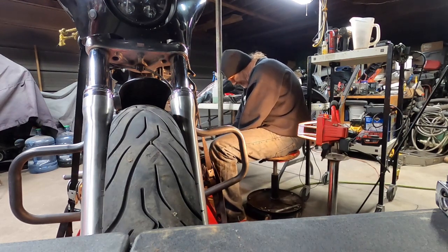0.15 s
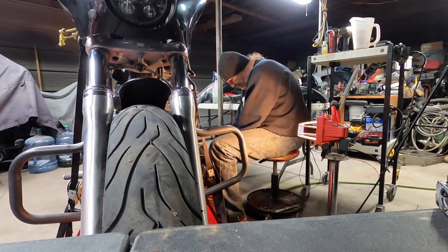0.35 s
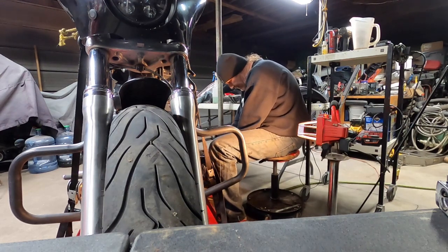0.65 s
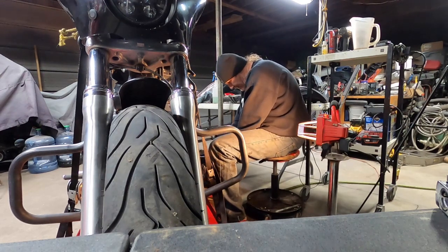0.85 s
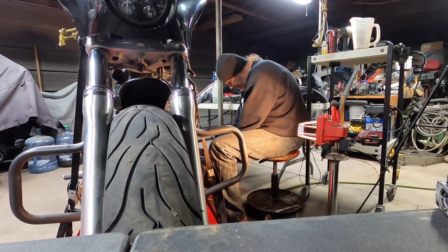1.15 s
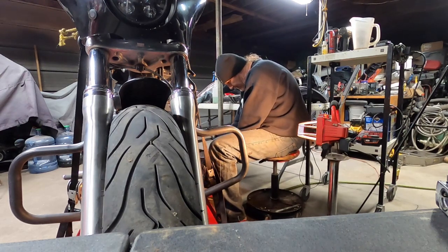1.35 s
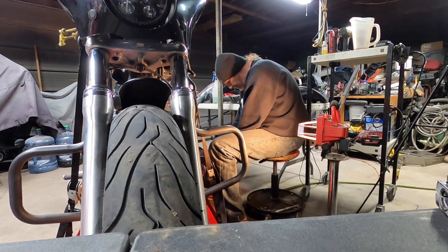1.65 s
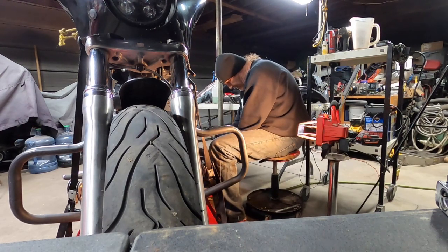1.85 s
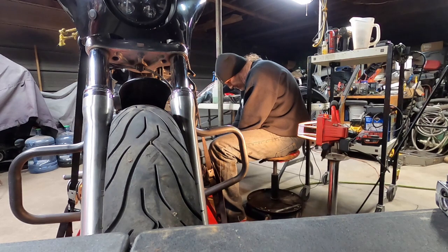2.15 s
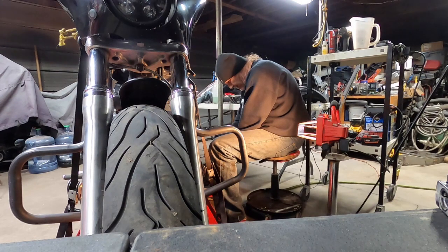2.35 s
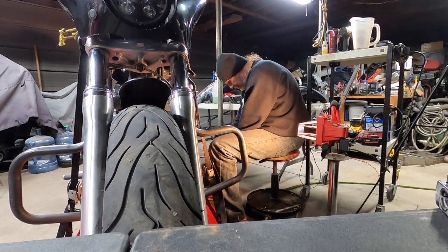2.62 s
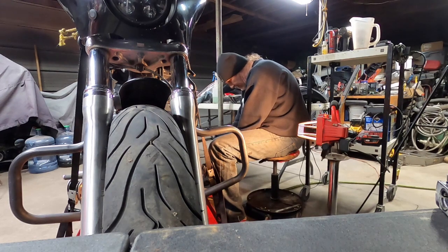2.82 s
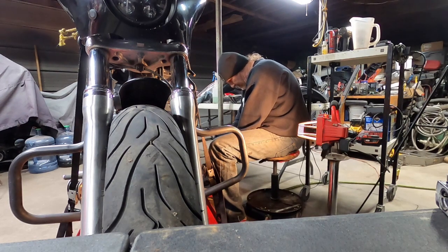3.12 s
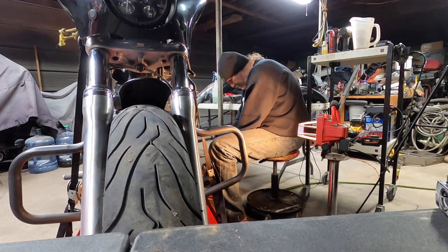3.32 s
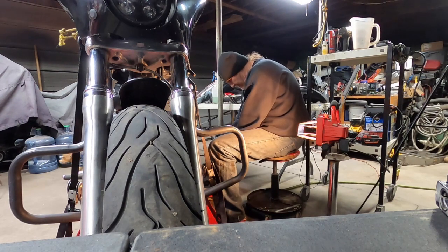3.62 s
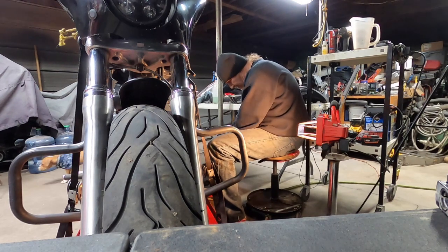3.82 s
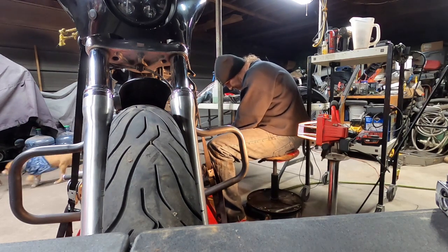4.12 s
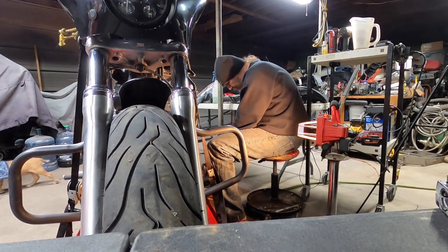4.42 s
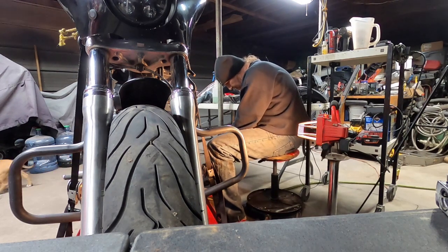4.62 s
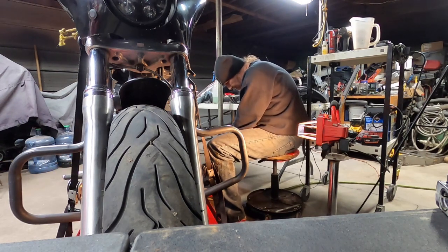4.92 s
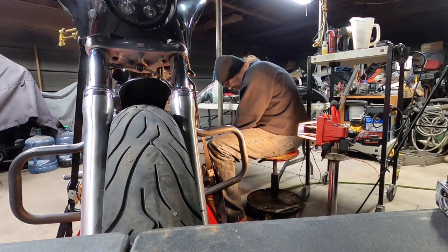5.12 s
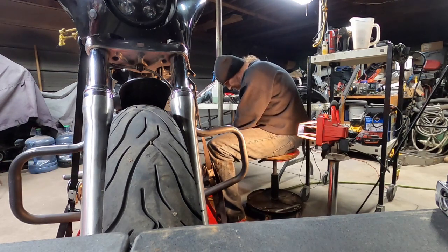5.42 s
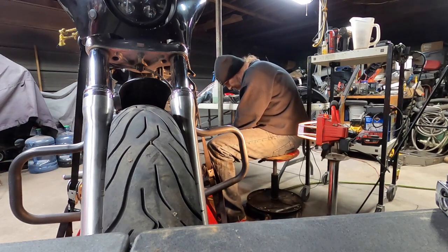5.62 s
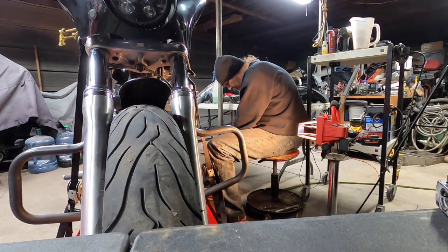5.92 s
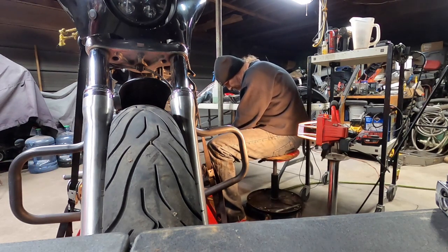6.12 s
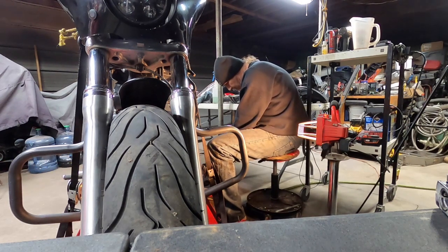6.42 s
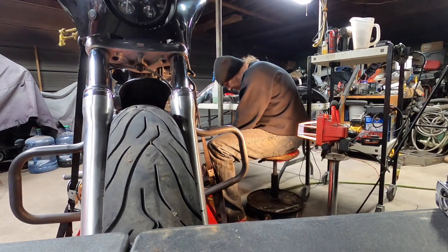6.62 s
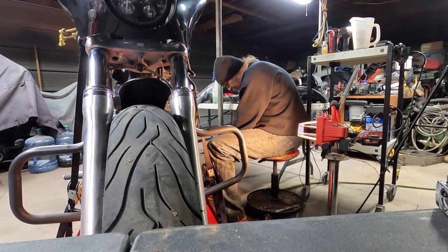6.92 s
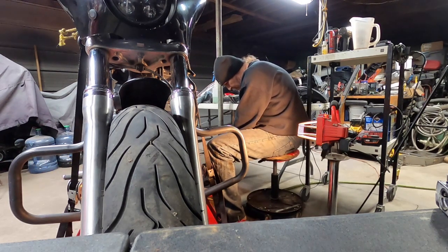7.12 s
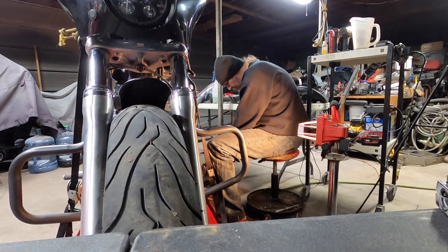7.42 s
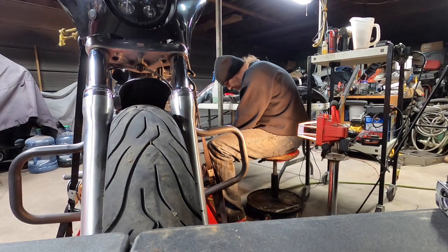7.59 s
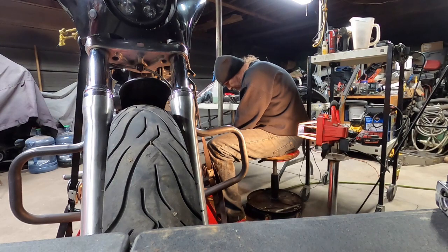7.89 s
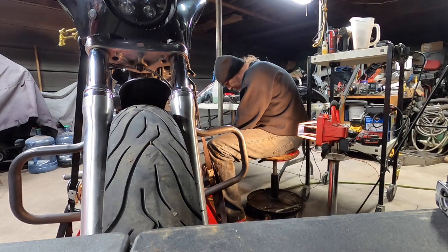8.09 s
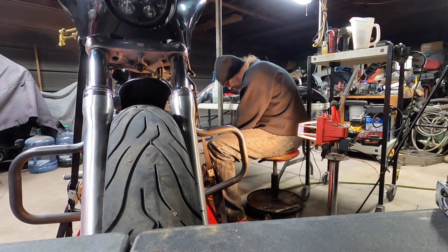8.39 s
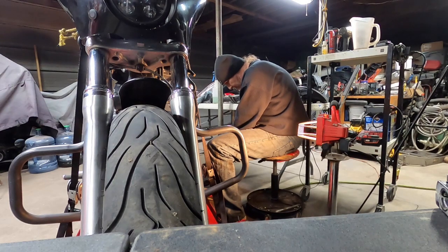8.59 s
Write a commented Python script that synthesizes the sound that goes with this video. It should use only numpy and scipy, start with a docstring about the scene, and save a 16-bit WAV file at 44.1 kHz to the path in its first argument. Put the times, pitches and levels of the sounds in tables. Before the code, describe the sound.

In a cluttered garage, a fan rushes and hums without pause, heavier on the left, over a low fluttering rumble. A few small metal parts clink, then an air tool rips out a quarter-second burst of hiss and rough hammering. A long quiet stretch with faint clinks follows, then two still shorter bursts come close together near the end. Stereo microphones nearby; the background dips after each burst and slowly returns.

```python
"""An air tool is fired in three short bursts on a motorcycle in a garage: exhaust air hisses out at once,
then the piston hammers unevenly, shaking the frame and ringing the steel. Small parts clink.
A fan rushes and hums throughout, mostly on the left microphone, above a low rumble of the building.
The microphones' gain control ducks at each burst and slowly lets the hum back."""
import sys
import numpy as np
from scipy import signal
from scipy.fft import rfft, irfft, next_fast_len
from scipy.io import wavfile
from scipy.ndimage import uniform_filter1d, minimum_filter1d, map_coordinates

SR = 44100
rng = np.random.default_rng(int(sys.argv[2]) if len(sys.argv) > 2 else 0)


def unload_wav(signal):
    """Save mono or channel-first audio to the path in sys.argv[1] as 16-bit WAV at rate SR, clipped to [-1, 1]."""
    wavfile.write(
        sys.argv[1],
        SR,
        np.round(np.clip(np.atleast_2d(signal).T, -1, 1) * 32767).astype(np.int16),
    )


N = 385866
T = np.arange(N) / SR

# trigger pulls: pulled_s, released_s, valve_closing_time_constant_s, relative_air_level_db,
# piston_delay_s, full_strokes_per_s, relative_swing_level_db, slackening_at_s
PULLS = [(2.139, 2.398, 0.012, -4, .03, 151, 1, 2.315), (7.266, 7.438, 0.031, -4, 0.028, 152, 1, 7.394),
         (7.836, 8.035, 0.016, -4.5, .022, 157, -0.5, 7.956)]


def amp(db):
    """Gain of a level in dB."""
    return 10 ** (np.asarray(db) / 20)


def unit(x):
    """x at rms 1."""
    return x / np.sqrt(np.mean(x ** 2) + 1e-20)


def along(points, hz):
    """(Hz, value) points read on a log frequency axis."""
    f, v = np.transpose(points)
    return np.interp(np.log(hz + 1), np.log(f + 1), v)


def wobble(rate):
    """A smooth random curve with rate knots a second."""
    knots = rng.standard_normal(int(N * rate / SR) + 4)
    coarse_t = T[::32]
    return np.interp(T, coarse_t, map_coordinates(knots, [coarse_t * rate]))


def filtered(x, response):
    """x times a complex response of frequency."""
    m = next_fast_len(N + SR // 2)
    return irfft(rfft(x, m) * response(np.fft.rfftfreq(m, 1 / SR)), m)[..., :N]


def resonate(x, modes):
    """x through a sum of (Hz, width Hz, dB) resonances, each squared for steep sides."""
    def response(f):
        return sum(amp(db) * (1j * f * w / (c * c - f * f + 1j * f * w)) ** 2 for c, w, db in modes)
    return filtered(x, response)


def left_late(pair, phase):
    """The left microphone lags the right by (Hz, radians)."""
    return np.array([filtered(pair[0], lambda f: np.exp(-1j * along(phase, f))), pair[1]])


def garage(x, wet_db, shade_hz=30000):
    """A source and its diffuse echo at both microphones; obstacles shade the direct treble."""
    # decay of the garage: pitch_hz, t60_s
    decay = [(100, 0.35), (500, 0.59), (3000, 0.34), (7000, 0.29), (14000, 0.2)]
    hz, t, z = signal.stft(rng.standard_normal((2, SR // 2)), SR, nperseg=256)
    tail = signal.istft(z * amp(-60 * t / along(decay, hz)[:, None]), SR, nperseg=256)[1]
    tail = tail / np.linalg.norm(tail[0])
    late = np.pad(x, (130, 0))  # the echo starts about 3 ms after the direct sound
    echo = signal.fftconvolve(late[None], tail, axes=1)[:, :N]
    direct = filtered(x, lambda f: 1 / np.hypot(1, (f / shade_hz) ** 2))
    return (direct + amp(wet_db) * echo) / np.hypot(1, amp(wet_db))


def trigger(open_s, onset_db, onset_s):
    """Air flow: the valve opens, the flow settles from its onset level, the valve shuts."""
    flow = np.zeros(N)
    for start, stop, close_s, db, *_ in PULLS:
        age = np.maximum(T - start, 0)
        valve = np.minimum(age / open_s, 1) * np.exp(-np.maximum(T - stop, 0) / close_s)
        flow += valve * amp(db + onset_db * np.exp(-age / onset_s))
    return flow


def piston(scatter_s, uneven_db, bounce):
    """The mass builds up, slackens once and coasts to rest: a smooth swing and one uneven blow a stroke."""
    # buzz of the swinging mass: multiple_of_stroke_rate, level_db
    buzz = [(1, -0.5), (2, -10.5), (3, -18.5), (4, -23.5)]
    build_s, coast_s = 0.047, 0.02  # linear build-up; time constant of coasting after release
    slow_start, spin_up_s = 0.28, 0.026  # share of rate missing at first; time constant of its recovery
    rate_wander, force_wander_db = 0.03, 0.6  # scales of chance drift in rate (share) and force
    slack_db, slack_slows, slack_s = 10, 0.16, 0.017  # slackening: depth, share of rate lost, half length
    swing, blows = np.zeros((2, N))
    drift = 1 + rate_wander * wobble(25)
    push = amp(force_wander_db * wobble(30))
    chances = rng.standard_normal((len(PULLS), 128, 3))
    for (start, stop, _, _, delay_s, rate, db, slack_at), chance in zip(PULLS, chances):
        inside = (T > start + delay_s) & (T < stop + 4 * coast_s)
        t = T[inside]
        age = t - start - delay_s
        slack = np.exp(-((t - slack_at) / slack_s) ** 2)
        speed = 1 - slow_start * np.exp(-age / spin_up_s) - slack_slows * slack
        turns = np.cumsum(rate * speed * drift[inside]) / SR
        envelope = np.minimum(age / build_s, 1) * np.exp(-np.maximum(t - stop, 0) / coast_s)
        force = envelope * push[inside] * amp(db - slack_db * slack)
        swing[inside] = force * sum(amp(level) * np.sin(2 * np.pi * k * turns) for k, level in buzz)
        # one blow for each whole stroke
        when = np.interp(np.arange(int(turns[-1]) + 1), turns, t)
        late, strong, skip = chance[:len(when)].T
        # the bounce strengthens and weakens blows in a loose cycle of three
        contact = np.abs(1 + bounce * np.cos(np.cumsum(2 * np.pi / 3 + 0.45 * skip)))
        strength = contact * np.interp(when, t, force) * amp(uneven_db * strong)
        blows[((when + scatter_s * late) * SR).astype(int)] = strength
    return swing, blows


def air_tool():
    """Exhaust hiss chopped by the strokes, the buzzing piston, the thudding frame and the clattering steel."""
    # frame shaken by the strokes: pitch_hz, width_hz, level_db
    frame_modes = [(57, 10, -1), (101.5, 39.6, 6), (157, 71, -3), (258.6, 45, -2), (295.4, 33, -9),
                   (448, 66, -9), (642, 72, -18), (873, 360, -18.5)]
    # steel of the tool and the work: pitch_hz, width_hz, level_db
    steel_modes = [(1575, 250, -9.5), (2333, 120, -1), (2410, 66, -2.5), (2529, 82, 2.5), (2810, 74, -5.5),
                   (2810, 46, -7), (2820, 50, -4), (3600, 16, -7), (4106, 190, -4.5), (4570, 250, -3),
                   (4714, 170, -3.5), (5220, 79, -1), (5660, 30, -8)]
    # exhaust air spectrum: pitch_hz, relative_level_db_per_hz
    air_colour = [(100, -10), (400, -4), (800, -2), (1250, -5), (1900, -1), (2700, 0.5), (3500, 1),
                  (4600, 0.5), (7000, -2.5), (8300, -7), (10000, -13), (13000, -16), (13800, -22),
                  (16000, -25)]
    flow = trigger(open_s=0.018, onset_db=-1.0, onset_s=0.015)
    swing, blows = piston(scatter_s=0.0006, uneven_db=2.2, bounce=0.7)
    running = np.sqrt(np.mean(flow ** 2))
    # each stroke lets out a short puff of air, dying with a 1.6 ms time constant
    puffs = unit(signal.lfilter([1], [1, -np.exp(-1 / (SR * 0.0016))], blows)) * running
    air = unit(filtered(rng.standard_normal(N), lambda f: amp(along(air_colour, f))))
    hiss = garage(air * (0.73 * flow + 0.24 * puffs), wet_db=8.5, shade_hz=6000)
    # flowing air and puffs both excite the steel
    steel = resonate((flow + 0.18 * puffs) * rng.standard_normal(N), steel_modes)
    clatter = garage(unit(steel), wet_db=-16) * running * amp(-5.5)
    shake = amp(-3.0) * unit(swing) + amp(-2.0) * unit(resonate(blows, frame_modes))
    thud = unit(garage(shake, wet_db=-8.0)) * running * amp(-1.1)
    lag = [(150, 2.7), (600, 0.64), (2000, 1.52), (5000, 1.63), (9000, 2.9)]
    return thud + left_late(hiss + clatter, lag)


def clinks():
    """Each touch of a small part is a brief chink: decaying noise through a doubled resonance."""
    # small parts handled: start_s, level_db, pitch_hz, width_hz, t60_s
    touches = [(1.130, -28.5, 3160, 650, 0.059), (1.134, -34, 2600, 600, .1),
               (1.252, -38, 2750, 900, 0.085), (1.732, -33.5, 3000, 2000, 0.07),
               (5.686, -39.5, 5030, 2400, 0.11), (5.689, -45.5, 7700, 1400, 0.16),
               (6.156, -47, 6000, 3000, 0.049), (6.497, -55, 7450, 1050, 0.17),
               (8.546, -30, 1500, 1200, .025)]
    out, t = np.zeros(N + SR), np.arange(SR // 4) / SR
    for s, db, hz, width_hz, t60 in touches:
        b, a = signal.iirpeak(hz, hz / width_hz, SR)
        once = signal.lfilter(b, a, rng.standard_normal(len(t)))
        ring = unit(signal.lfilter(b, a, once))
        out[round(s * SR):][:len(t)] += ring * amp(db - 60 * t / t60)
    return garage(out[:N], wet_db=3.5)


def fan():
    """Rushing air, housing resonances and a wavering hum, mostly on the left microphone."""
    # rushing air spectrum: pitch_hz, relative_level_db_per_hz
    rush_colour = [(76, -46), (130, -16.5), (263, -11.5), (308, -9.5), (377, -9.5), (531, -5.5),
                   (843, -11.5), (989, -8.5), (1280, -16), (1600, -15.5), (2000, -20.5), (3170, -25.5),
                   (8000, -44), (14600, -86.5), (15800, -78)]
    # hum tones: pitch_hz, relative_level_db
    hum_tones = [(301.5, -43), (323.0, -45), (403.7, -46.5), (452.2, -44), (522.2, -35.5), (974.4, -50),
                 (1308, -71), (1410, -47), (1631, -55.5)]
    # housing resonances: pitch_hz, width_hz, level_db
    housing_modes = [(318, 76, -5.5), (474.6, 66, 0.5), (551, 49, -0.5), (995, 83, -3.5), (1431, 59, -13.5),
                     (1630, 60, -3.5), (2370, 95, -11)]
    # balance of the microphones: pitch_hz, left_minus_right_db
    side = [(110, 0), (380, 6.5), (1290, 3.9), (2400, 3.5), (8000, 4), (12000, 0.7)]
    # likeness of the rush at the microphones: pitch_hz, likeness (0-1)
    alike = [(70, 0.87), (210, 0.13), (320, 0.85), (1000, 0.88), (3200, 0.65), (4500, 0.086), (12000, 0.12)]
    hum = np.zeros(N)
    for hz, db in hum_tones:
        level = amp(db + 2.5 * wobble(11)) * np.sqrt(2)
        hum += level * np.sin(2 * np.pi * hz * T + 0.85 * wobble(11))
    rush = unit(filtered(rng.standard_normal((2, N)), lambda f: amp(along(rush_colour, f))))

    def share(f):
        """Split of the rush into what the microphones have in common and what sets them apart."""
        angle = np.arccos(np.clip(along(alike, f), 0, 1)) / 2
        return np.array([np.cos(angle), np.sin(angle)])

    common, apart = filtered(rush, share)
    body = unit(garage(resonate(rng.standard_normal(N), housing_modes), wet_db=-1))
    pair = amp(-29.5) * np.array([common + apart, common - apart]) + amp(-34) * body + amp(-1.0) * hum
    wavering = pair * amp(0.85 * wobble(2.93))
    sided = filtered(wavering, lambda f: amp(np.outer([0.5, -0.5], along(side, f))))
    return left_late(sided, [(200, 0.77), (320, 0.95), (550, 1.3), (900, 2.0), (3000, 1.43), (8000, 2.7)])


def rumble():
    """The building's lowest modes flutter, almost alike at both microphones."""
    # low modes of the building: pitch_hz, width_hz, level_db
    low_modes = [(28.6, 14, -4), (52.9, 18, -0.5), (109, 34, -16.5)]
    flutter = wobble(9)
    flutter = flutter - uniform_filter1d(flutter, size=SR // 2)  # without its slow drift
    low = resonate(rng.standard_normal((2, N)), low_modes) * amp(5.5 * np.minimum(flutter, 1))
    return amp(-38.5) * unit(low[0] + amp(-11) * np.array([low[1], -low[1]]))


def scene():
    """Everything in the garage."""
    return air_tool() + fan() + rumble() + clinks()


def gain_control(x, limit_db, attack_s, hold_s, release_s):
    """The gain drops when the running level passes the limit, holds, then creeps back."""
    step = 1 - np.exp(-1 / (SR * attack_s))
    power = signal.lfilter([step], [1, step - 1], np.mean(x ** 2, axis=0))
    excess = np.maximum(10 * np.log10(power + 1e-12) - limit_db, 0)
    half = int(hold_s * SR / 2)
    held = -minimum_filter1d(-excess, 2 * half + 1, origin=half)
    # the cut in dB dies away exponentially unless a new excess is larger
    fade = np.exp(-T / release_s)
    cut = np.maximum.accumulate(held / fade) * fade
    return x * amp(-uniform_filter1d(cut, size=200))


def record(dry):
    """Slow gain control, a quick limiter, microphone hiss, brighter right treble, soft clipping, band limit."""
    # the microphones' own hiss: pitch_hz, relative_level_db_per_hz
    hiss_colour = [(4000, -6), (10500, -1.5), (12600, 0.5), (13400, -9), (16000, -9)]
    noise = rng.standard_normal((2, N))
    hiss = amp(-68.5) * unit(filtered(noise, lambda f: amp(along(hiss_colour, f))))
    ducked = gain_control(dry, limit_db=-10.5, attack_s=0.071, hold_s=0.14, release_s=0.43)
    levelled = gain_control(ducked, limit_db=-9.5, attack_s=0.0028, hold_s=0.0011, release_s=0.02)
    right_db = [(3000, -0.5), (5000, -0.5), (8500, -0.5), (12000, 3.0)]  # right minus left
    ports = filtered(levelled + hiss, lambda f: amp(np.outer([-0.5, 0.5], along(right_db, f))))
    clipped = ports / (1 + ports ** 6) ** (1 / 6)
    return filtered(clipped, lambda hz: hz < 15850)


dry = scene()
out = record(dry)
unload_wav(out)
```